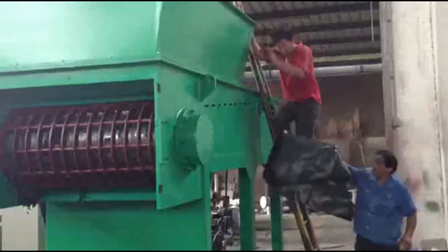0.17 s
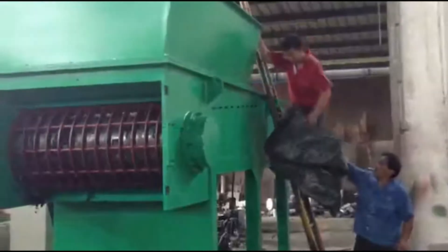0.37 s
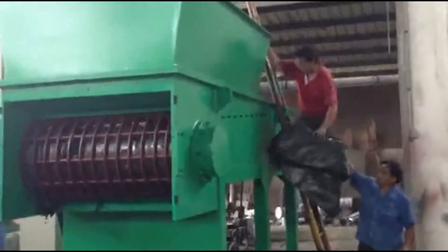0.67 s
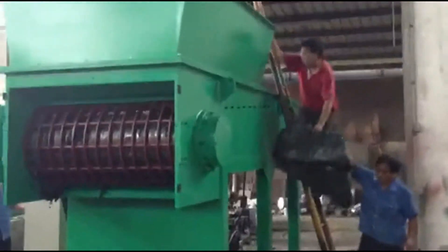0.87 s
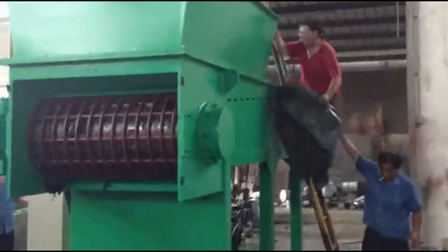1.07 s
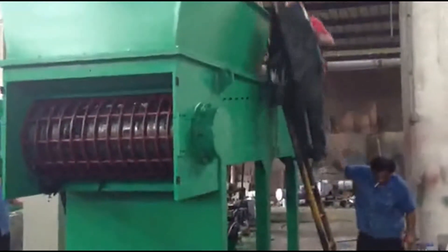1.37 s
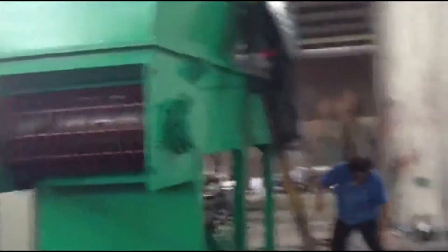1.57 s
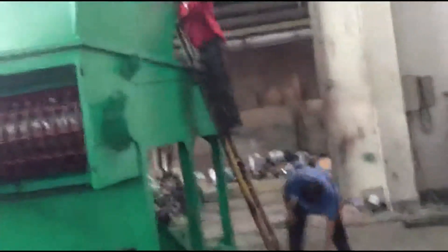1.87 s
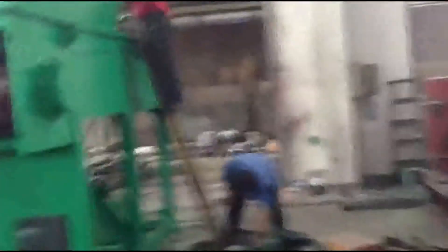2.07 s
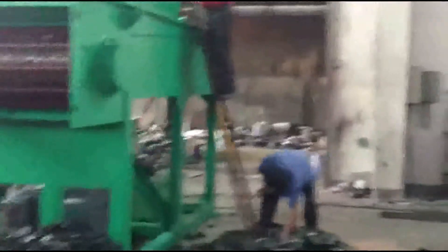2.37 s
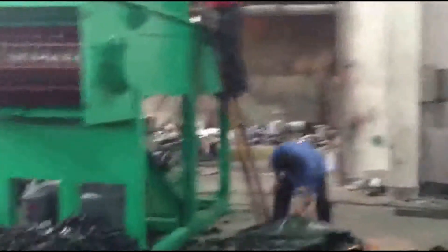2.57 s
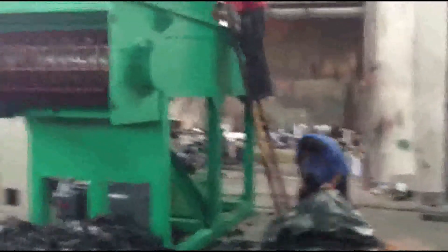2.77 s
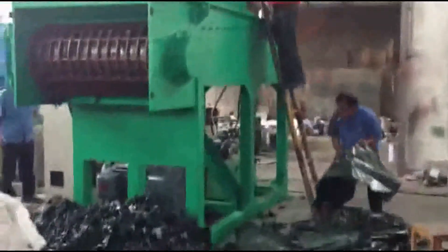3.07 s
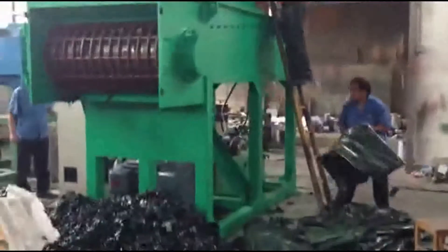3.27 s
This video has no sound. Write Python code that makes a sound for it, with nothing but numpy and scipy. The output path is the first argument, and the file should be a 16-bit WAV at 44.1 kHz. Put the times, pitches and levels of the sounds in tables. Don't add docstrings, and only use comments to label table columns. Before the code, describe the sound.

A heavy plastic shredder runs continuously in an industrial hall, its low rumble and steady gear whine shifting as the handheld microphone turns midway; knives jolt, film rustles sharply, and late loads knock the steel panel.

```python
import sys
import numpy as np
from scipy import signal
from scipy.fft import rfft, irfft, next_fast_len
from scipy.io import wavfile
from scipy.ndimage import uniform_filter1d, map_coordinates

SR = 44100
rng = np.random.default_rng(int(sys.argv[2]) if len(sys.argv) > 2 else 0)


def amplitude_ratio(level_db):
    exponent = np.asarray(level_db, float) / 20
    return 10 ** exponent


def store_wav(level_fs):
    pcm = np.round(np.clip(np.atleast_2d(level_fs), -1, 1) * 32767)
    wavfile.write(sys.argv[1], SR, pcm.T.astype(np.int16))


N = 151263


def unit(x):
    return x / np.sqrt(np.mean(x ** 2) + 1e-20)


def along(points, hz):
    f, v = np.transpose(points)
    return np.interp(np.log(hz + 1), np.log(f + 1), v)


def wobble(rate_hz):
    return map_coordinates(rng.standard_normal(400), [np.arange(N) * np.clip(rate_hz, .1, 90) / SR])


def filtered(x, response):
    size = next_fast_len(len(x) + 8192)
    return irfft(rfft(x, size) * response(np.fft.rfftfreq(size, 1 / SR)), size)[:len(x)]


def patches(shape, bands, moments):
    blurred = uniform_filter1d(rng.standard_normal(shape), size=bands, axis=0)
    return unit(uniform_filter1d(blurred, size=moments, axis=1))


def rush(response, patchy_db):
    z = signal.stft(rng.standard_normal(N), nperseg=512)[2]
    z = z * amplitude_ratio(patchy_db * patches(z.shape, 8, 8))
    return unit(filtered(signal.istft(z, nperseg=512)[1][:N], response))


# start_s, level_db
ROAR_LEVEL = [
    (.2, -35),
    (.4, -33.5),
    (.7, -32.5),
    (1.2, -32),
    (1.7, -32),
    (2.2, -34),
    (2.7, -33),
    (3.1, -32.5),
    (3.43, -34.5),
]
# start_s, level_db
RUMBLE_LEVEL = [(.2, 4.5), (.3, 6), (.5, 7), (.9, 2.5), (1.3, 4.5), (1.42, 2.5), (1.6, 2.5), (2.1, 5),
                (2.6, 2.5), (3.1, 6), (3.43, 4)]
# pitch_hz, level_db (per Hz)
FRAME_COLOR = [(15, -62), (25, -52), (102, -15), (123, -6.5), (189, 4), (291, 1), (321, -7), (349, -3.5),
               (700, -8.5), (910, -11), (1540, -120)]
# pitch_hz, level_db (per Hz)
GRIND_COLOR = [(290, -7), (500, -1), (1530, -6.5), (1880, -7), (2050, -9.5), (4320, -11.5), (7790, -21.5),
               (11000, -29), (15500, -28.5)]
GRIND_DB, HANDOVER_HZ = -0.76, 640


def roar():
    t = np.arange(N) / SR
    level_db = np.interp(t, *np.transpose(ROAR_LEVEL))
    rumble_db = np.interp(t, *np.transpose(RUMBLE_LEVEL))

    def low(hz):
        return 1 / (1 + (hz / HANDOVER_HZ) ** 4)

    frame = rush(lambda hz: amplitude_ratio(along(FRAME_COLOR, hz)) * np.sqrt(low(hz)), patchy_db=-0.06)
    grind = rush(lambda hz: amplitude_ratio(along(GRIND_COLOR, hz)) * np.sqrt(1 - low(hz)), patchy_db=1)
    frame = amplitude_ratio(rumble_db + 1.8 * wobble(15)) * frame
    grind = amplitude_ratio(GRIND_DB + 0.7 * wobble(11.03)) * grind
    return amplitude_ratio(level_db) * (frame + grind)


MESH_HZ = 321.7
# multiple (of the tooth rate), facing_db, turned_away_db
GEAR_TONES = [(1, -41, -32), (2, -49, -46), (3, -60, -51), (4, -62, -54), (5, -62, -55), (6, -48, -54),
              (7, -66, -57), (9, -55, -59), (10, -54, -55), (11, -58, -58), (12, -50, -56), (13, -47, -56),
              (14, -52, -54), (15, -57, -57), (16, -62, -53), (17, -62, -64), (18, -63, -63),
              (19, -66, -60), (20, -64, -63), (21, -70, -62), (22, -68, -67), (23, -63, -72),
              (24, -75, -75), (28, -75, -79), (30, -77, -79), (39, -75, -84)]
# pitch_hz, facing_db, turned_away_db
MOTOR_TONES = [(136.5, -43, -34), (988.6, -60, -48), (1261.5, -53, -46), (1640, -53, -53), (1700, -60, -53),
               (3268, -54, -60), (3488, -55, -62), (3515, -64, -56), (3639.5, -51, -64), (3811, -56, -56),
               (3838, -55, -64), (3962, -58, -60), (4090, -58, -61), (4274, -64, -58), (4600, -57, -60),
               (4753.4, -54, -59), (4850, -57, -64), (4976, -57, -66), (5841, -65, -72), (8842, -72, -72),
               (9510.5, -68, -80), (11070, -76, -85), (11219, -72, -83), (12333, -73, -85),
               (12080, -72, -70), (11763, -72, -70), (12721, -73, -71), (15676.5, -71, -78)]
# multiple, start_s, length_s, gain_db
FLARES = [(1, 1.6, .5, 7), (6, 1.42, .3, 2), (6, .75, .4, -4), (6, 1.72, .3, -1), (6, .2, .3, -5),
          (6, 2.05, .2, 3), (12, .2, .9, -5), (10, 2.03, .14, 13), (10, 2.2, .4, 4), (12, 1.9, .8, 4),
          (12, 3.05, .3, 5), (13, .7, .6, -4), (13, 1.6, .4, -3), (13, 3.1, .2, 6), (14, 1.3, .3, 4),
          (14, 2.0, .12, 10), (14, 2.48, .28, 9), (14, 2.75, .2, 10), (14, 3.03, .09, 10),
          (14, 3.26, .1, 7), (15, 1.6, .45, 6), (9, 1.65, .2, 3), (16, 2.0, .2, 4), (16, 2.25, .25, -3),
          (16, 3.1, .35, -5), (24, 1.73, .05, 22), (24, 1.785, .015, 24), (24, 1.86, .06, 23),
          (24, 2.31, .08, 21), (24, 2.82, .07, 22), (24, 3.01, .06, 21)]
TURN_S, TURN_TAKES_S = 2.05, .3
FADING_DB, FLICKER_DB, WAVER_RAD = 1.8, 3.2, 1.2


def whine():
    t, out = np.arange(N) / SR, np.zeros(N)
    turned = 1 / (1 + np.exp(-4 * (t - TURN_S) / TURN_TAKES_S))
    gears = [(k * MESH_HZ, facing, away) for k, facing, away in GEAR_TONES]
    for hz, facing_db, away_db in gears + list(MOTOR_TONES):
        drift = wobble(7.01)
        fade = FADING_DB * wobble(5.02) + FLICKER_DB * wobble(14)
        fade = fade * min(0.19 + hz / 3000, 1)
        flare = 0
        for k, start, length, gain_db in FLARES:
            if k * MESH_HZ == hz:
                flare = flare + gain_db * np.exp(-(2 * (t - start) / length - 1) ** 4)
        level_db = facing_db + (away_db - facing_db) * turned + fade + flare
        phase = 2 * np.pi * hz * t + WAVER_RAD * drift + 2 * np.pi * rng.random()
        out += np.sqrt(2) * amplitude_ratio(level_db) * np.sin(phase)
    return out


# start_s, level_db, pitch_hz
BITES = [(.307, -13.5, 210), (0.37, -22, 180), (.427, -18, 185), (.45, -15, 187.5), (.52, -23, 234),
         (.56, -19.5, 180), (.66, -22, 224), (0.754, -16.5, 241), (0.824, -15, 208), (0.919, -22, 185),
         (1.09, -19, 240), (1.27, -19, 243), (1.341, -20, 180), (1.487, -16, 207), (1.553, -18, 188),
         (2.018, -17, 263), (2.075, -19, 208)]
BITE_RISE_S, BITE_T60_S = 0.0073, 0.12


def bites():
    out, t = np.zeros(N + SR), np.arange(SR // 8) / SR
    for start, db, hz in BITES:
        rise = 1 - np.exp(-(t / BITE_RISE_S) ** 2)
        throb = amplitude_ratio(db - 60 * t / BITE_T60_S) * rise * np.sin(2 * np.pi * hz * t)
        out[round(start * SR):][:len(t)] += throb
    return out[:N]


# start_s, length_s, level_db, tilt_db (brightness per octave), fullest_hz
FILM_TUGS = [(0.471, 0.19, -37.5, -9, 1140), (.53, .11, -45, 0, 10000), (0.586, 0.14, -34.5, -4, 2820),
             (0.816, .06, -38, -5, 3700), (1.22, .03, -46, 1, 10000), (1.315, 0.011, -44, 2.5, 5000),
             (1.377, .02, -40, 0, 4300), (1.389, 0.023, -30, 1, 4300), (1.39, 0.024, -37, 0, 8800),
             (1.406, 0.11, -36, 2.5, 4300), (1.411, 0.16, -40.5, -30, 10400), (1.492, .07, -35.5, -3, 3500),
             (1.503, 0.068, -43, 3, 10300), (1.787, .03, -48, 0, 8000), (1.823, .014, -43, 9, 11000),
             (1.893, 0.016, -41, 3.5, 10000), (2.155, 0.065, -48, 1, 11000), (2.82, .1, -35, -2.5, 2180),
             (2.824, 0.1, -51, 1, 10000), (2.871, 0.097, -43.5, -2, 1100), (3.327, 0.038, -49, 8, 10000),
             (3.35, 0.082, -32.5, -7.5, 2820)]
# pitch_hz, level_db
SHEET_COLOR = [(710, -34), (1200, -6), (1960, -6), (3110, -7), (4340, -6), (6050, -12.5), (15500, -21)]
FULLEST_DB, FULLEST_OCTAVES = 7, .45
CRACKLES_PER_S, CRACKLE_SPREAD_DB, BIGGEST = 3000, 3, 3


def film():
    out, t = np.zeros(N + SR), np.arange(SR // 2) / SR
    for start, length, db, tilt_db, fullest_hz in FILM_TUGS:
        size = np.minimum(rng.exponential(size=len(t)), BIGGEST)
        snaps = (rng.random(len(t)) < CRACKLES_PER_S / SR) * amplitude_ratio(CRACKLE_SPREAD_DB * size)
        rustle = 1.3 * rng.standard_normal(len(t))
        grains = unit(snaps * rng.standard_normal(len(t))) + rustle

        def color(hz):
            octaves_off = np.log2((hz + 1) / fullest_hz)
            bump_db = FULLEST_DB * np.exp(-(octaves_off / FULLEST_OCTAVES) ** 2)
            slope_db = tilt_db * np.log2((hz + 1) / 4000)
            no_bass = 1 / (1 + (900 / (hz + 1)) ** 4)
            return amplitude_ratio(along(SHEET_COLOR, hz) + bump_db + slope_db) * no_bass

        swell = np.clip(t / (.15 * length), 0, 1) * np.exp(-(t / length) ** 4)
        out[round(start * SR):][:len(t)] += amplitude_ratio(db) * swell * unit(filtered(grains, color))
    return out[:N]


# start_s, level_db, pitch_hz, t60_s (time to die away by 60 dB)
THUDS = [(0.206, -14, 198, 0.038), (2.876, -18.5, 345, 0.15), (2.906, -12.5, 264, 0.075),
         (2.92, -12, 333, 0.08), (2.923, -22, 520, 0.063), (2.936, -14, 276, 0.24), (2.94, -26, 617, 0.15),
         (2.955, -25, 665, 0.12), (2.968, -20, 281, 0.1), (2.99, -26, 658, 0.096), (3.347, -15, 180, 0.21),
         (3.381, -17.5, 204, 0.25), (3.395, -13.5, 225, 0.069), (3.41, -24, 415, 0.14)]
CLATTER_DB, CLATTER_HZ = -10.5, 810
BODY_LOW_HZ = 94


def hopper():
    out, t = np.zeros(N + SR), np.arange(SR // 4) / SR

    def rattle(hz):
        return hz * hz / (hz * hz + 300 ** 2) / (1 + (hz / CLATTER_HZ) ** 4)

    for start, db, hz, t60 in THUDS:
        clatter = unit(filtered(rng.standard_normal(len(t)), rattle))
        ring = -np.sin(2 * np.pi * hz * t)
        shape = amplitude_ratio(db - 60 * t / t60) * (1 - np.exp(-t / 0.00071))
        out[round(start * SR):][:len(t)] += shape * (amplitude_ratio(CLATTER_DB) * clatter + ring)
    return filtered(out[:N], lambda hz: 1 / np.sqrt(1 + (BODY_LOW_HZ / (hz + 1)) ** 6))


# start_s (middle of the lump), level_db
GRIPS = [(.23, -54), (.72, -60), (1.2, -53), (1.52, -61), (1.83, -58), (2.15, -55), (2.36, -55),
         (2.55, -52), (2.7, -52), (2.95, -48), (3.15, -56), (3.3, -57)]
GRIP_S, GRIP_FLOOR_DB = 0.047, -80


def handling():
    t = np.arange(N) / SR
    lumps = amplitude_ratio(GRIP_FLOOR_DB)
    for middle, db in GRIPS:
        lumps = lumps + amplitude_ratio(db) * np.exp(-((t - middle) / GRIP_S) ** 2)
    rub = filtered(rng.standard_normal(N), lambda hz: hz / (hz + 25) / (1 + (hz / 75) ** 4))
    return lumps * unit(rub)


def scene():
    return (roar() + bites() + whine() + film() + hopper() + handling())[None]


# start_s, end_s
LOW_GAPS = [(.25, .48), (.59, 1.34), (1.45, 1.49), (1.6, 1.715), (1.81, 1.855), (1.93, 2.31), (2.4, 2.8),
            (2.9, 3.0), (3.08, 3.41)]
# start_s, end_s
HIGH_GAPS = [
    (.3, 1.28),
    (1.6, 1.8),
    (1.95, 2.42),
]
# low_hz, high_hz, share_empty (0 to 1)
SCATTER = [
    (6300, 7200, .1),
    (7200, 7590, .25),
    (12000, 14300, .04),
    (14300, 14900, .15),
    (14900, 15620, .6),
    (15720, 22050, 1),
]
LOW_GAP_HZ, HIGH_GAP_HZ = (7590, 7850), (15120, 15520)


def treble_holes(x):
    hz, t, z = signal.stft(x, SR, nperseg=1024)
    for (low, high), spans in ((LOW_GAP_HZ, LOW_GAPS), (HIGH_GAP_HZ, HIGH_GAPS)):
        shut = sum((t > a) & (t < b) for a, b in spans) > 0
        z[np.ix_((hz > low) & (hz < high), shut)] = 0
    chance = patches(z.shape, 3, 10)
    for low, high, share in SCATTER:
        band = ((hz > low) & (hz <= high))[:, None]
        z[band & (chance <= np.quantile(chance, share))] = 0
    return signal.istft(z, SR, nperseg=1024)[1][:N]


def roll_off(x):
    return signal.sosfilt(signal.butter(12, 15690, fs=SR, output="sos"), x)


START_S, FADE_IN_S, FADE_DB = 0.2, 0.044, -9.5


def record(dry):
    since = np.arange(N) / SR - START_S
    rise = amplitude_ratio(FADE_DB * np.clip(1 - since / FADE_IN_S, 0, 1))
    x = dry[0] * np.clip(since / 0.0077, 0, 1) * rise
    x = treble_holes(x) * (since > 0)
    return roll_off(x[None])


dry = scene()
out = record(dry)
store_wav(out)
```